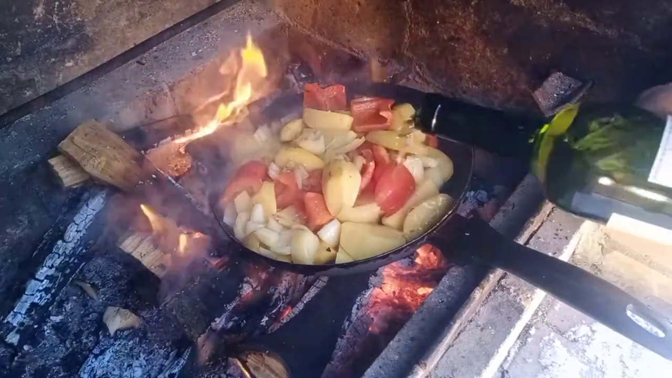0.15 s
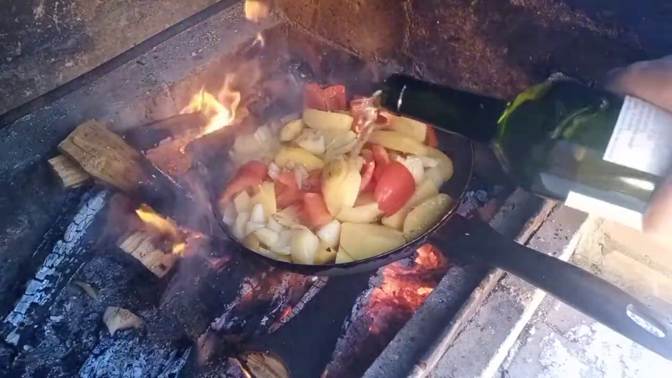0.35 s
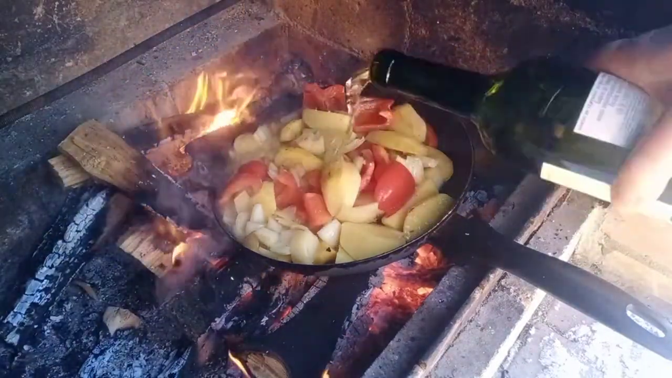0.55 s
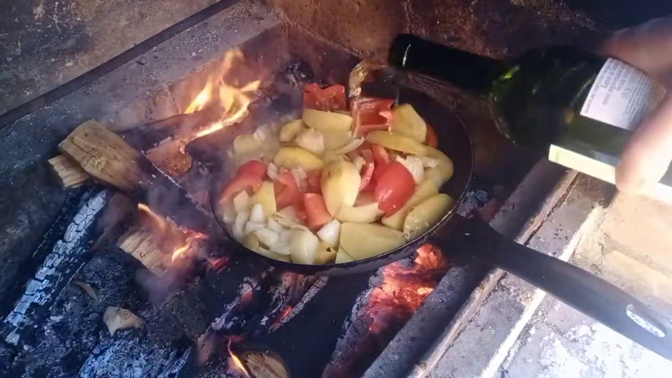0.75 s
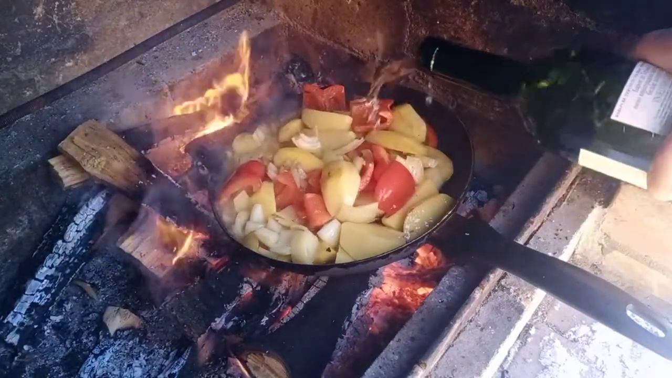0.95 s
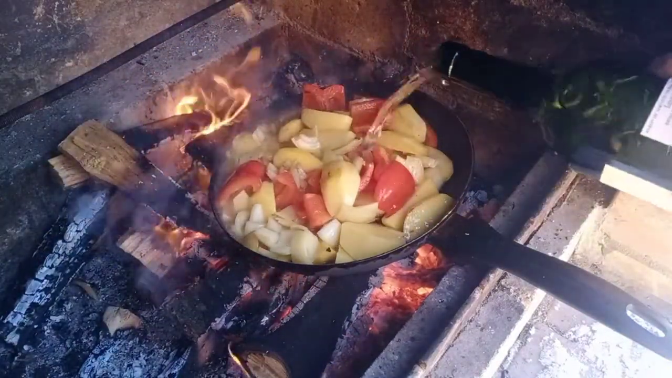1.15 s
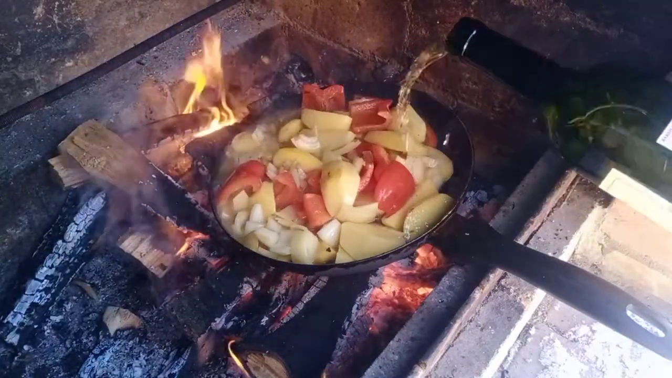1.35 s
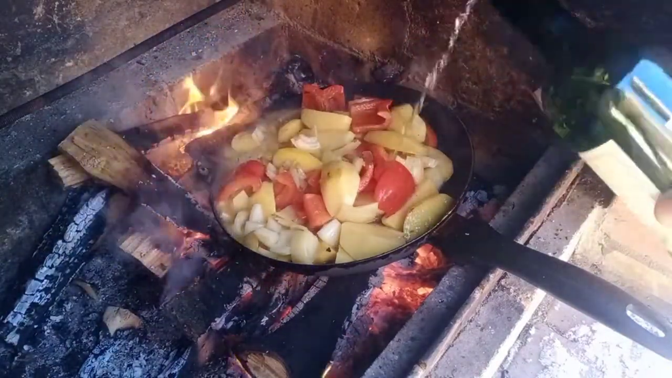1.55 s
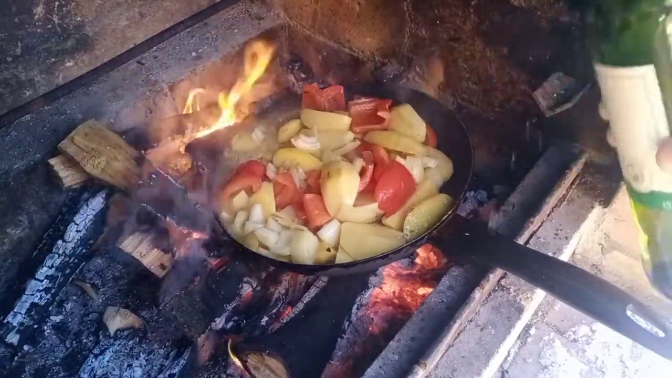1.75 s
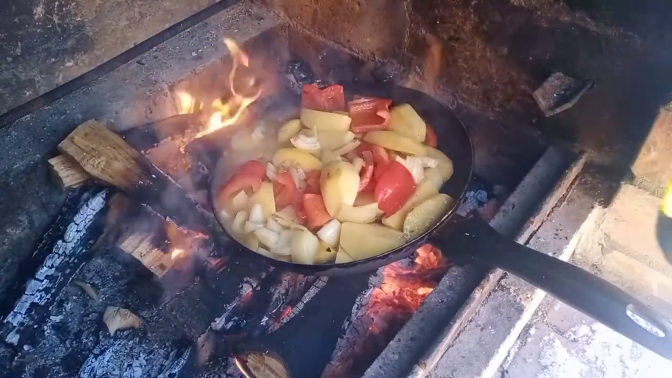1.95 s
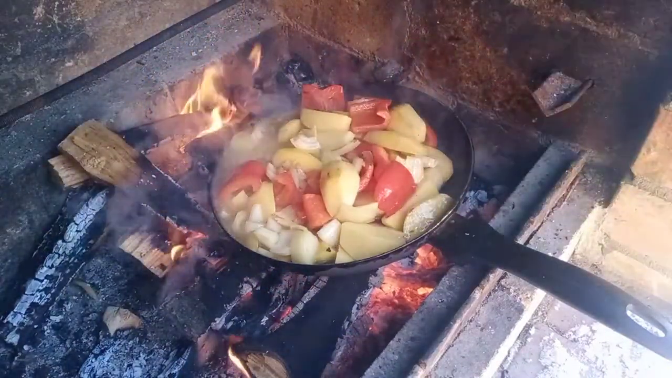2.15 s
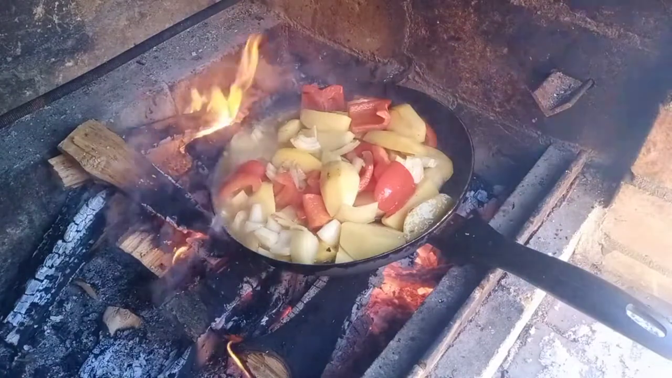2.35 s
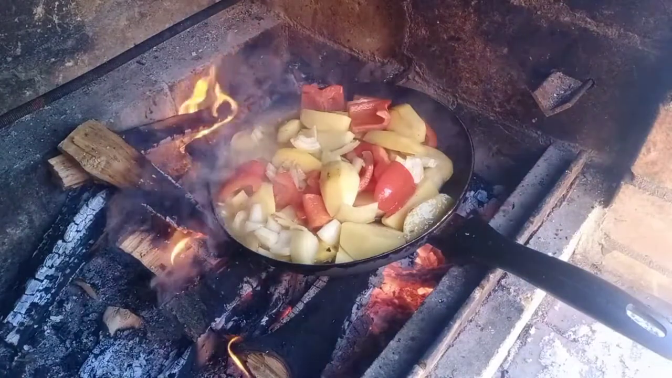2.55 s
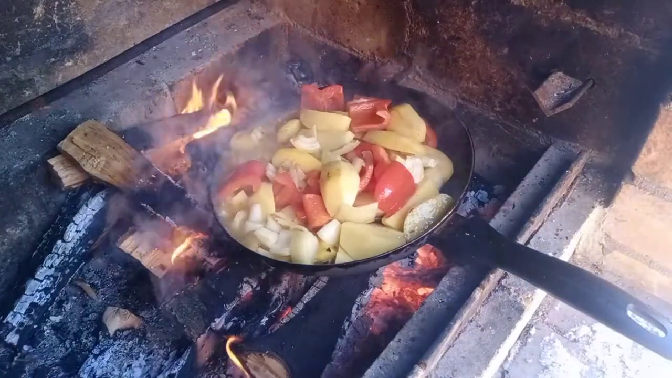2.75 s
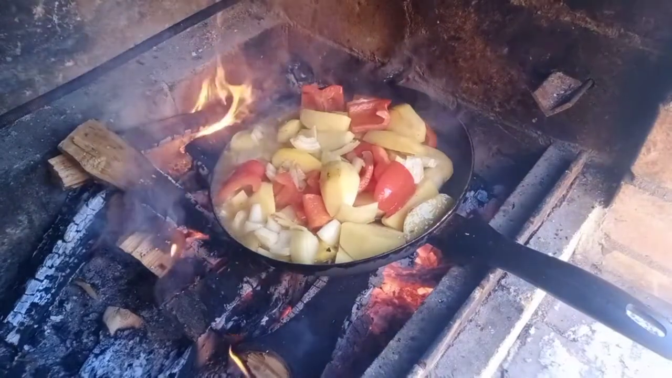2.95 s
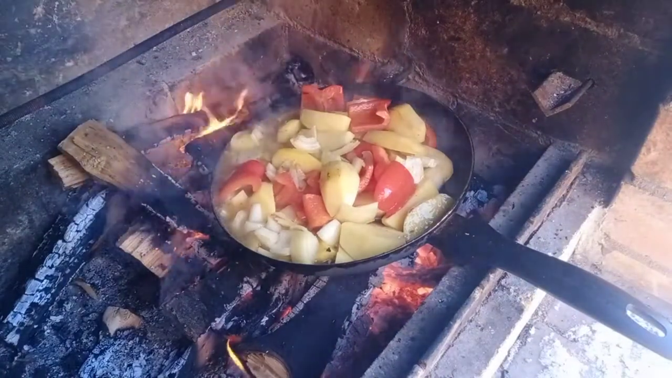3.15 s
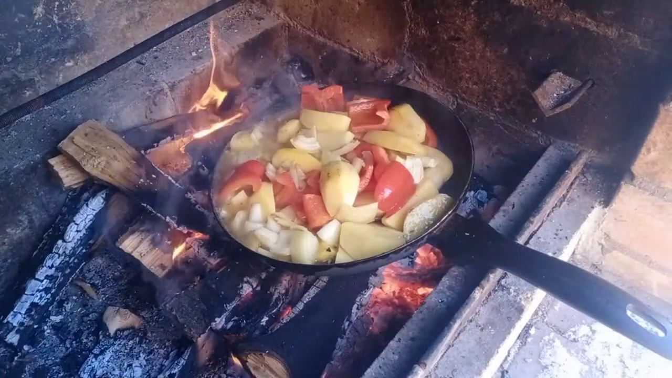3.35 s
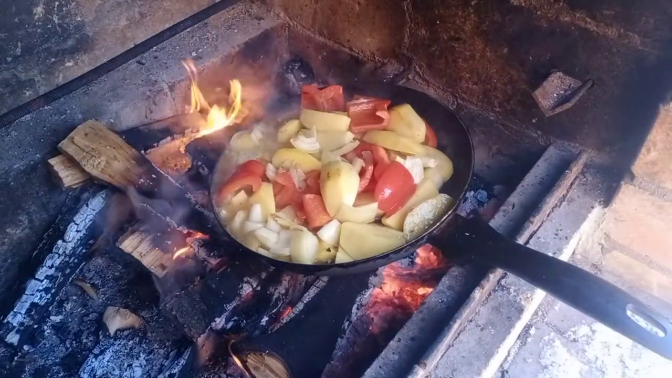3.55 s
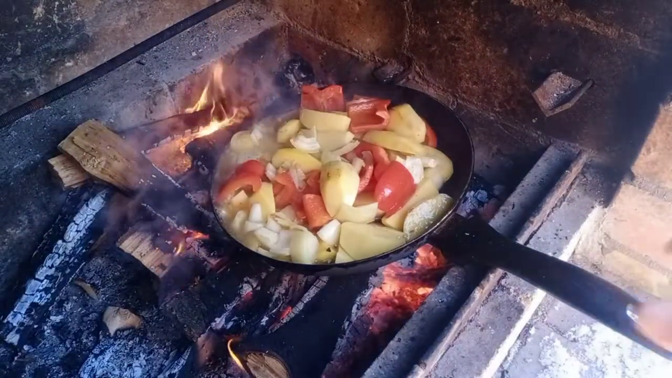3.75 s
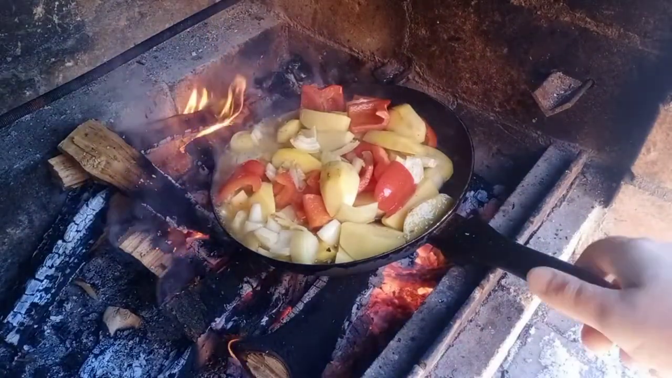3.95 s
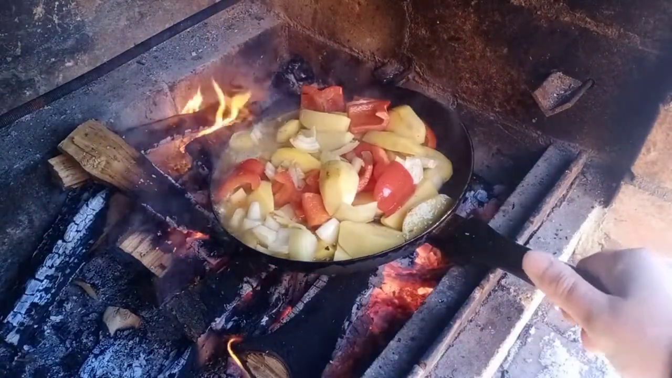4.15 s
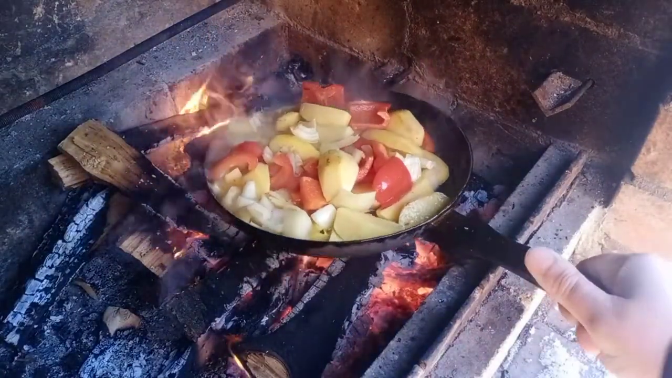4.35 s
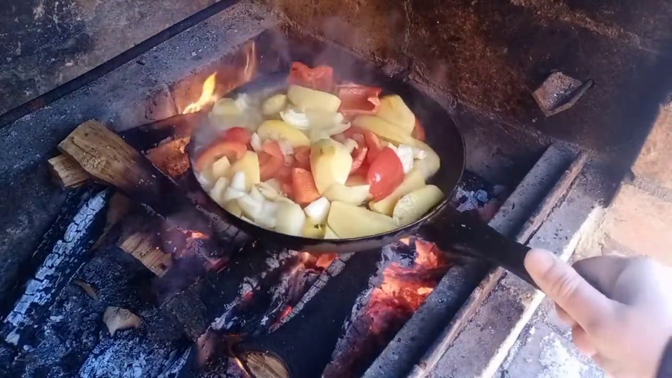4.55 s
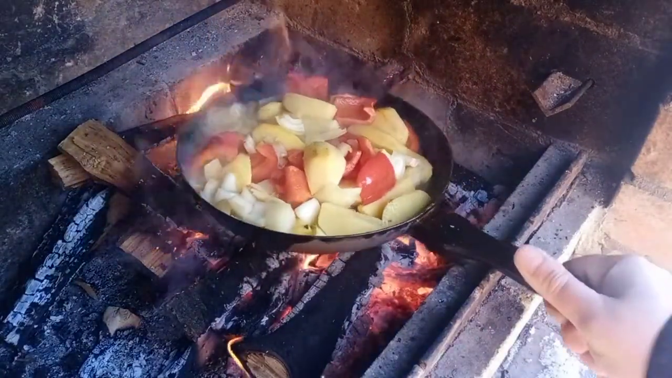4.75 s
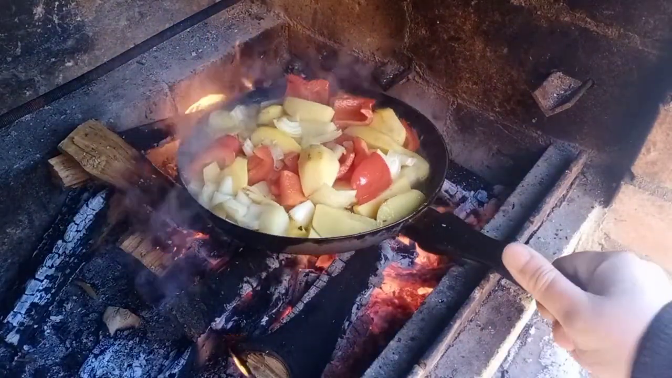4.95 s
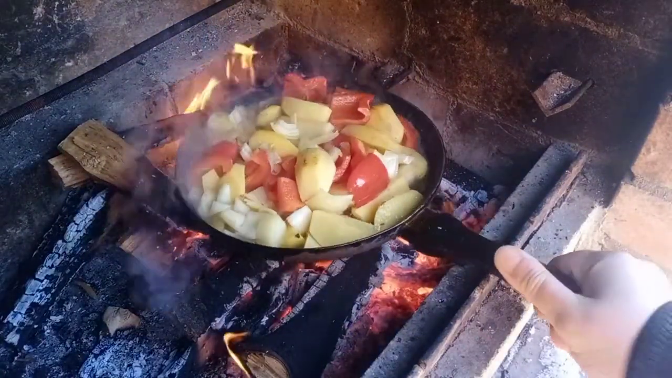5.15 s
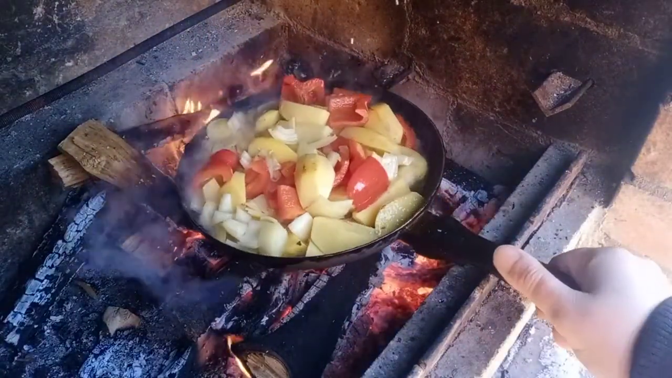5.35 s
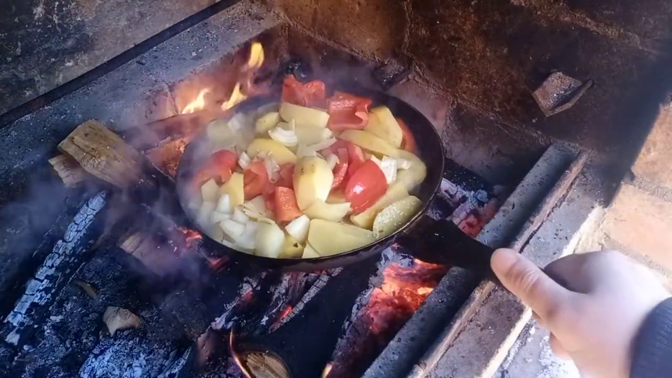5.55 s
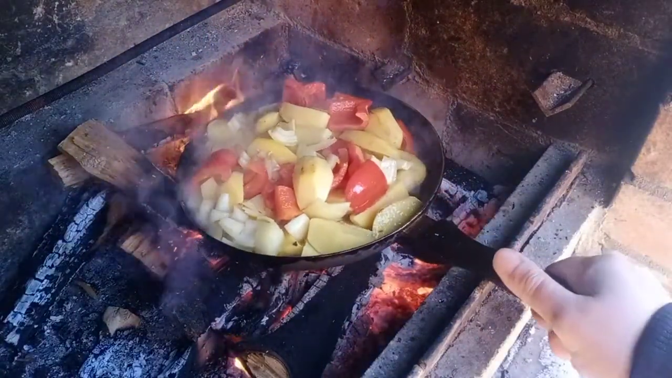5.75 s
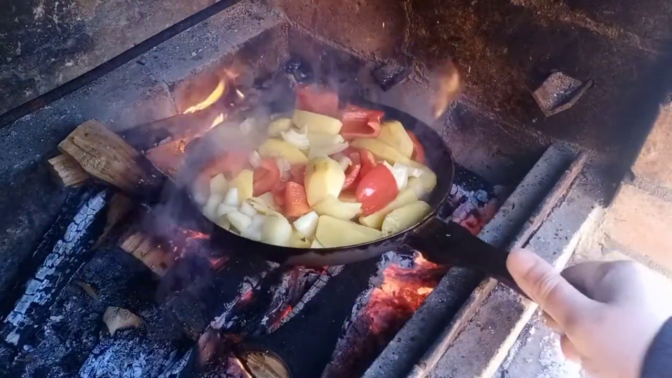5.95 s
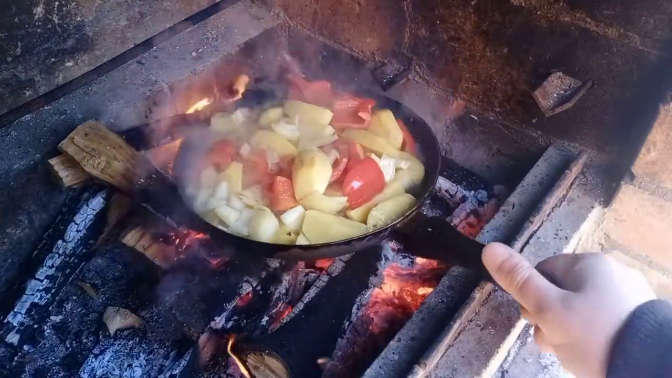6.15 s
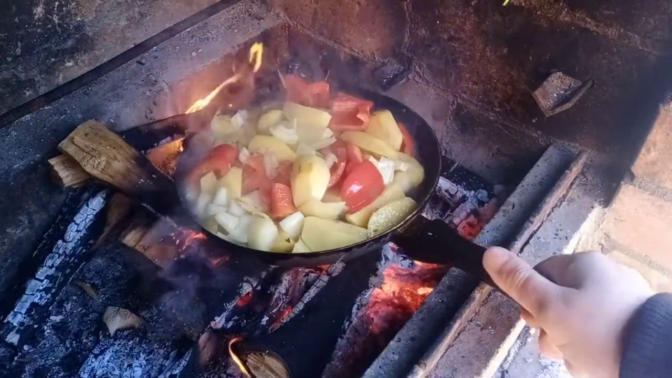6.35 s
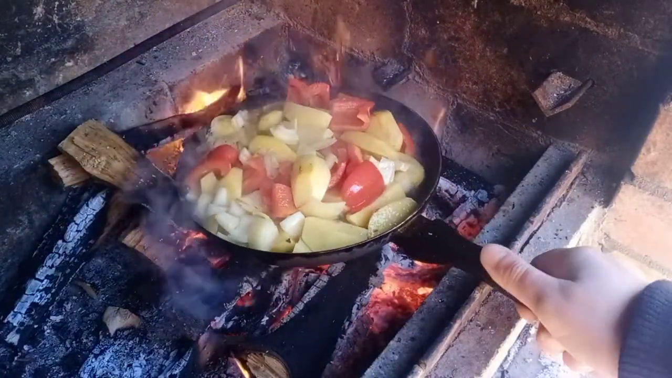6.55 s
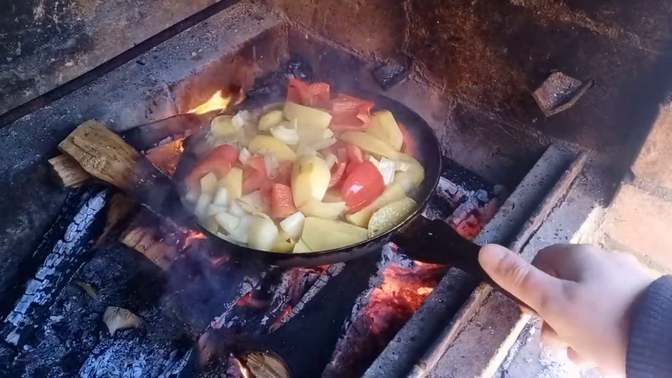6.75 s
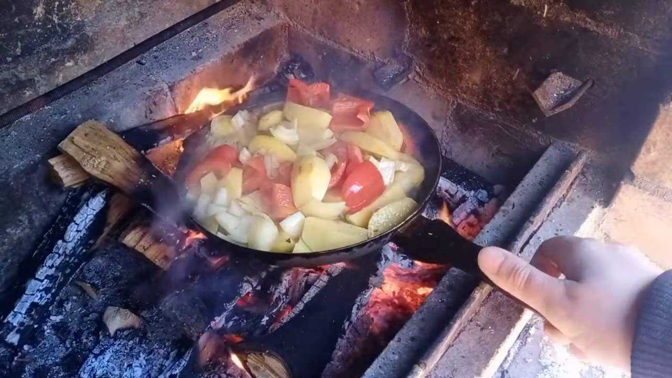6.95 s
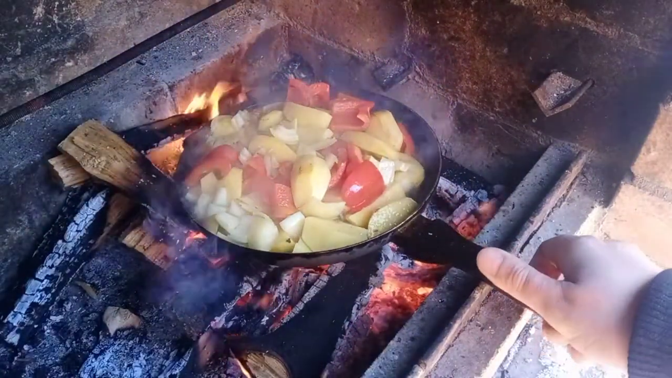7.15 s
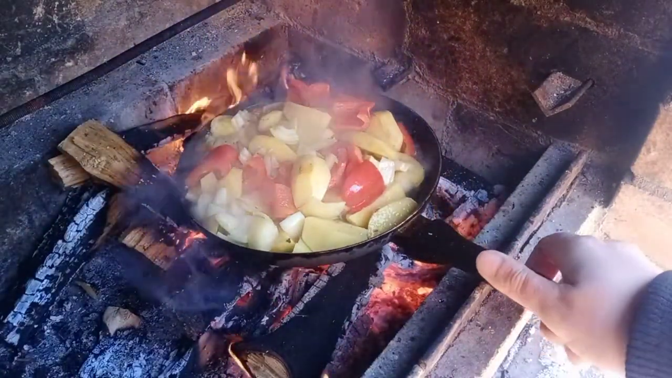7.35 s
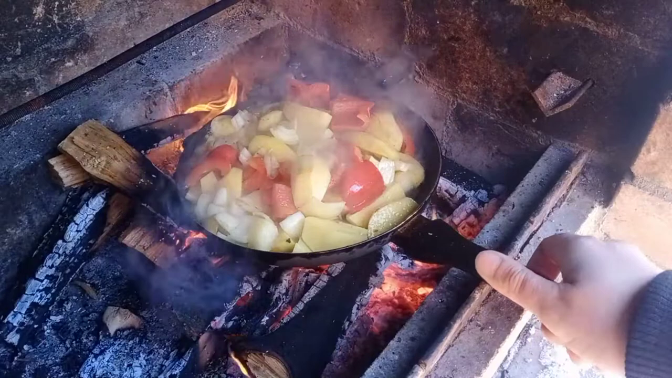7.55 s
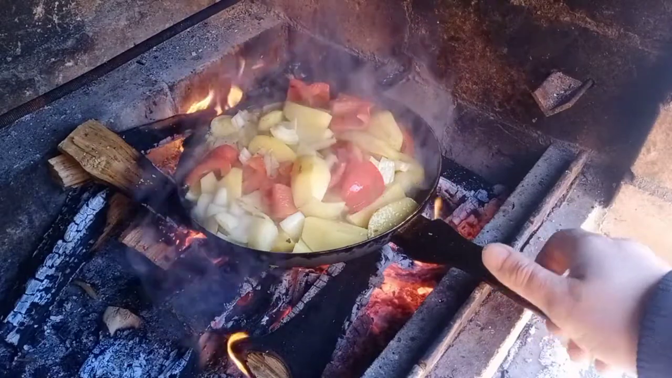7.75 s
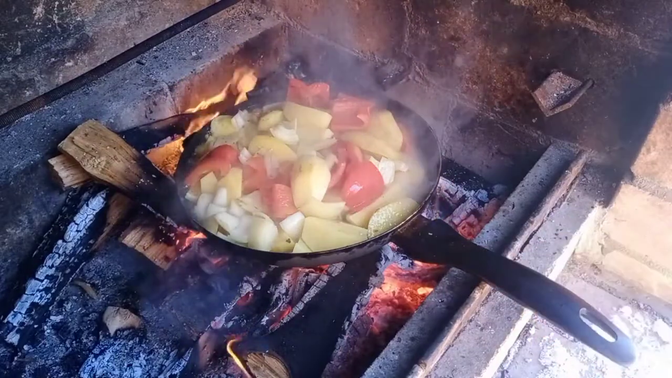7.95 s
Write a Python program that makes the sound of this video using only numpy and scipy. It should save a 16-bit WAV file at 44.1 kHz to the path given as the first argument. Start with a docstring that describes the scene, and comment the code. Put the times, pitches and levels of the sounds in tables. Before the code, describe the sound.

Close-up of a hot iron pan of vegetables on an outdoor wood fire. A strong, bright steam hiss with dense bubbling starts at once, with low gurgles and fluttering flames beneath. It eases after a few seconds, surges briefly around five seconds, then dries into separate sharp spits and snaps, fading quietly. Dry, mono, close microphone.

```python
"""Steam hiss and swarms of bursting bubbles rise from liquid boiling off in a hot iron pan on a wood fire.
Hiss is patchy noise, bubbles are short noise puffs; as the pan dries, single banded spits stand out.
Below, a deeper boil is noise bands and wandering gurgle tones, strongest early and again near 5 s.
Flames flutter and flare in the bass as filtered noise, with a weak roar and a quiet air bed."""
import sys
import numpy as np
from scipy import signal
from scipy.fft import rfft, irfft, next_fast_len
from scipy.io import wavfile
from scipy.ndimage import uniform_filter1d, map_coordinates

SR = 44100
rng = np.random.default_rng(int(sys.argv[2]) if len(sys.argv) > 2 else 0)


def file_out(sig):
    """Save sig as 16-bit WAV at sys.argv[1]."""
    # one column per channel
    cols = np.atleast_2d(sig).T
    # limit, then scale
    lim = np.clip(cols, -1, 1)
    pcm = np.round(lim * 32767).astype(np.int16)
    wavfile.write(sys.argv[1], SR, pcm)


N = 356761

# Pan levels: (time [s], sizzle [dB], fine spray [dB], rim [dB])
PAN_LEVELS = [(0, -23.5, -31.5, -44.5), (1.5, -24.5, -31.5, -42), (2, -26, -31.5, -41.5),
              (2.9, -26.5, -31.5, -44), (3.5, -28.5, -34, -49.5), (4, -29, -33, -42.5),
              (4.4, -30, -35, -58), (4.7, -28.5, -32, -62), (5, -25.5, -33.5, -40.5),
              (5.3, -26.5, -34, -48), (5.6, -29, -37, -52), (5.9, -32, -40, -78), (6.2, -29, -35, -52.5),
              (6.8, -32, -38, -58), (7.1, -34, -40.5, -77), (7.4, -35.5, -42.5, -66),
              (7.7, -35.5, -43.5, -67), (8.09, -36.5, -40, -52.5)]
# Gain of the pan and its load: (frequency [Hz], relative gain [dB])
PAN_COLOUR = [(640, -55.5), (1080, -33), (1220, -24), (1320, -11), (1410, -10.5), (1480, -10.5),
              (1550, -10.5), (1670, -6.5), (1970, -6), (2140, -9), (2240, -9), (2660, -1.5), (2830, -5),
              (3250, -2), (3370, -7), (3560, -3.5), (4190, 0.5), (4550, -4), (4930, -5), (5400, 1),
              (5710, -1), (6140, -5), (6970, -12.5), (7780, -18.5), (9500, -45), (12400, -61),
              (20900, -120)]
# Gain of the fine spray: (frequency [Hz], relative gain [dB])
SPRAY_COLOUR = [(4710, -28.5), (8000, -15), (9220, -20.5), (11300, -17.5), (12700, -9), (14000, -3),
                (15800, -1)]
# Gain of the rim, lowest band of the hiss: (frequency [Hz], relative gain [dB])
RIM_COLOUR = [(1150, -66.5), (1260, -1.5), (1340, -1.5), (1470, 6.5), (1580, -23), (1800, -52.5)]
THIN_HZ, THIN_SHARE = 2280, 0.24  # a fully dry pan loses this share of its sizzle below THIN_HZ

# Base levels of the low sounds: (time [s], upper boil [dB], roar [dB], bubbling [dB])
LOW_LEVELS = [(0, -44.5, -50.5, -47), (.7, -43.5, -53, -48), (.83, -52, -56.5, -57), (.95, -43.5, -58, -50),
              (1.55, -44.5, -62, -49), (2.1, -46.5, -64.5, -50), (2.3, -52.5, -67, -54.5),
              (2.95, -46.5, -64, -53), (3.35, -56, -67, -53), (3.9, -62.5, -69, -61), (4.75, -70, -71, -66),
              (5, -46, -63, -52), (5.3, -44, -55, -55), (5.5, -66, -66, -60.5), (6.3, -72, -69, -65),
              (7.1, -67, -71.5, -72), (8.09, -86, -68.5, -72)]
# Gain of the upper boil: (frequency [Hz], relative gain [dB])
UPPER_BOIL_COLOUR = [(530, -62.5), (900, -4), (934, -2), (970, 8.5), (1300, 13.5), (1690, -14),
                     (2860, -120)]
# Bubble sizes the load favours: (frequency [Hz], relative gain [dB])
LOOSE_COLOUR = [(260, -46.5), (450, -5.5), (470, -16), (510, -4), (595, -4), (621, -3.5), (710, -19),
                (795, 1.5), (891, -15), (968, 1.5), (1070, -8), (1150, 3), (1500, -26), (2530, -120)]
LOOSE_DB = -5.5  # re bubbling level
# Big and small steam pockets: (centre [Hz], width [Hz])
POCKETS = [(565, 139.7), (800, 88)]
# Big and small pockets between gurgles: level re bubbling [dB]
POCKETS_DB = [-14.5, -12]
# Gurgles of both pocket sizes: (start [s], length [s], level [dB], pitch before wander [Hz])
GURGLES = [(0.004, 0.11, -47, 558), (0.126, 0.17, -53, 563), (0.333, 0.11, -51, 542),
           (0.46, 0.176, -50, 558), (0.72, 0.055, -46, 575), (0.948, 0.13, -51.5, 565),
           (1.134, 0.03, -49, 591), (1.189, 0.04, -51.5, 595), (1.267, 0.18, -50.5, 553),
           (1.461, 0.048, -53.5, 552), (1.546, 0.085, -53, 598), (1.681, 0.077, -50, 590),
           (1.912, 0.068, -52.5, 593), (2.017, 0.037, -56, 600), (2.104, 0.054, -48.5, 591),
           (0.009, 0.18, -54, 797), (0.615, 0.054, -54, 795), (0.853, 0.038, -53, 800),
           (1.266, 0.052, -53, 793), (1.422, 0.04, -57, 803), (1.641, 0.075, -55, 802),
           (1.802, 0.14, -58.5, 797), (2.023, 0.059, -51, 802), (2.238, 0.035, -59, 800),
           (2.407, 0.023, -48, 796), (2.8, 0.04, -56.5, 802), (2.913, 0.075, -46, 799),
           (3.21, 0.11, -53, 801), (5.07, 0.03, -52, 796), (5.248, 0.16, -53, 808)]
SOFT_S = 0.01  # half the edge width of gurgles and flares

# Steady flutter, before sway: (time [s], level [dB])
FLAME_LEVELS = [(0.0, -61), (0.4, -65), (1.67, -70), (2.68, -63), (3.87, -70), (4.64, -65), (4.75, -65),
                (5.16, -63.5), (6.76, -71), (6.89, -63.5), (7.73, -72), (8.09, -72)]
# Flares: (start [s], length [s], level [dB])
FLARES = [(0.013, 0.075, -56), (0.098, 0.088, -54), (0.22, 0.12, -55), (0.351, 0.094, -54),
          (0.459, 0.1, -49), (0.666, 0.046, -62), (0.75, 0.15, -57), (1.032, 0.036, -49),
          (1.119, 0.044, -59), (1.173, 0.073, -49.5), (1.289, 0.04, -60), (1.345, 0.036, -57),
          (1.486, 0.052, -53), (1.724, 0.12, -48), (1.87, 0.042, -60), (1.912, 0.057, -54),
          (2.039, 0.032, -56), (2.191, 0.079, -59.5), (2.919, 0.042, -55), (3.104, 0.061, -62),
          (4.194, 0.056, -57.5), (4.637, 0.072, -58), (4.965, 0.08, -52.5), (5.133, 0.059, -55),
          (5.22, 0.1, -56), (5.356, 0.11, -60), (5.653, 0.043, -58), (5.735, 0.092, -58),
          (6.17, 0.095, -55.5), (6.391, 0.057, -57), (6.725, 0.058, -57), (7.016, 0.047, -52),
          (7.21, 0.022, -56), (7.403, 0.036, -62), (7.903, 0.061, -58.5)]
# Gain of the flame flutter: (frequency [Hz], relative gain [dB])
FLUTTER_COLOUR = [(15, -48), (25, -37), (50, -7), (75, 6.5), (92, -0.5), (112, 7.5), (135, 1), (160, -10),
                  (210, -45), (350, -120)]
# Gain of the roar: (frequency [Hz], relative gain [dB])
ROAR_COLOUR = [(94, -23), (160, -0.5), (232, 4), (265, -1), (300, 3), (330, -4.5), (364, 3.5), (420, -9),
               (580, -22), (990, -120)]
FLAME_SWAY_DB, FLARE_ROAR_DB = 2.5, 2.5  # scale of the random sway; most a flare lifts the roar

# Gain of the quiet background: (frequency [Hz], relative gain [dB])
AIR_COLOUR = [(15, -24), (25, 8), (107, 9), (433, -7), (543, 9), (1040, 2), (1200, -38), (1560, -36),
              (2640, -120)]
AIR_DB = -71

# Standout spits, before part offsets and life limits:
# (time [s], reference level [dB], low part [dB], high part [dB], life T60 [s])
SPITS = [(0.2094, -18, -36, -34, 0.018), (0.221, -5, -28, -24, 0.022), (0.638, -6, -26, -22, 0.019),
         (1.067, -13, -32, -33, 0.026), (1.162, -17, -24, -32, 0.02), (1.2077, -16, -21, -28, 0.016),
         (1.4406, -4, -38, -22, 0.027), (1.6097, -15, -23, -33, 0.016), (1.6312, -8, -27, -21, 0.02),
         (1.758, -13, -22, -22, 0.035), (1.8375, -15, -20, -20, 0.022), (2.0634, -7, -23, -20, 0.031),
         (2.2196, -9, -34, -30, 0.016), (2.4094, -7, -38, -32.5, 0.017), (2.5262, -10, -30, -25, 0.022),
         (2.724, -15, -28, -17, 0.014), (2.8855, -21, -36, -19, 0.02), (2.9422, -9, -24, -23, 0.022),
         (2.96, -5, -23, -26, 0.02), (3.0383, -11, -25, -23, 0.02), (3.212, -20, -26, -21, 0.012),
         (3.341, -22, -34, -19, 0.02), (3.3975, -21, -38, -20, 0.022), (3.4361, -19, -33, -24, 0.02),
         (3.4562, -11, -31, -27, 0.016), (3.476, -8.5, -23, -21, 0.02), (3.5079, -22, -29, -33, 0.02),
         (3.5268, -16, -33, -22, 0.02), (3.5433, -14, -35, -25, 0.015), (3.6092, -7.5, -25, -27, 0.016),
         (3.668, -20, -31, -19, 0.017), (3.7269, -26, -23, -27, 0.016), (3.7606, -16, -22, -28, 0.026),
         (3.7922, -16, -22, -17, 0.018), (3.818, -14, -37, -29, 0.018), (3.8541, -11, -29, -22, 0.02),
         (3.8945, -14, -22.5, -25, 0.023), (3.9528, -21, -24.5, -22, 0.027), (3.9754, -12, -22, -22, 0.03),
         (4.0507, -9, -40, -18.5, 0.029), (4.128, -20.5, -21, -27, 0.023), (4.159, -13, -30, -21, 0.014),
         (4.1856, -15, -26, -22, 0.03), (4.2795, -12, -23, -19, 0.031), (4.3033, -9, -20.5, -28, 0.013),
         (4.3434, -19, -36, -21, 0.018), (4.363, -27, -38, -21, 0.016), (4.5076, -15, -26, -21, 0.032),
         (4.56, -15, -26, -24, 0.035), (4.5935, -17, -35, -26, 0.02), (4.803, -23, -30, -20, 0.029),
         (5.0277, -14, -19, -22.5, 0.028), (5.1334, -19, -21, -32, 0.017), (5.1547, -17, -31, -23, 0.02),
         (5.3717, -6, -35, -26, 0.022), (5.452, -5.5, -23, -30, 0.025), (5.4854, -10, -40, -25, 0.015),
         (5.571, -9, -21, -22.5, 0.027), (5.6121, -18, -29, -19, 0.018), (5.6628, -13, -24, -19, 0.029),
         (5.7056, -11, -27, -28, 0.033), (5.734, -8, -31, -19, 0.02), (5.761, -8, -38, -24, 0.022),
         (5.7892, -6, -26.5, -20, 0.017), (5.7983, -10, -18, -32, 0.021), (5.8233, -11, -28, -32, 0.034),
         (5.899, -9, -26, -15, 0.027), (5.9244, -22, -42, -33, 0.014), (5.9465, -5, -22, -25, 0.029),
         (5.9852, -19, -35.5, -27, 0.02), (6.018, -14, -22.5, -21, 0.02), (6.0662, -17, -19.5, -24, 0.022),
         (6.113, -15, -20, -20.5, 0.03), (6.1543, -11, -18, -29, 0.016), (6.203, -19, -29, -20, 0.025),
         (6.2383, -20, -27, -20, 0.022), (6.2721, -9, -25, -34, 0.026), (6.336, -15, -33.5, -28, 0.016),
         (6.3868, -18, -32, -24, 0.02), (6.4073, -9, -27, -28, 0.027), (6.4866, -20, -25, -27, 0.039),
         (6.545, -28, -19, -34, 0.02), (6.6264, -22, -20, -20.5, 0.022), (6.652, -13, -28, -23, 0.02),
         (6.721, -12, -26.5, -18.5, 0.028), (6.8269, -18, -21.5, -32, 0.037),
         (6.8655, -9.5, -26, -29, 0.018), (6.9184, -19, -32, -33, 0.016), (6.934, -12, -24, -28, 0.022),
         (6.9606, -19, -46, -23, 0.027), (6.993, -16.5, -44, -26, 0.023), (7.014, -9, -29, -36, 0.023),
         (7.0506, -8, -22.5, -28, 0.052), (7.0853, -21, -29, -30, 0.027), (7.1112, -13, -30, -23, 0.027),
         (7.1686, -21, -37.5, -31, 0.017), (7.2103, -6.5, -34, -27, 0.044), (7.253, -5, -38.5, -20.5, 0.03),
         (7.2825, -7.5, -45, -31, 0.028), (7.353, -13, -25, -37.5, 0.036), (7.3796, -18, -30, -28.5, 0.023),
         (7.453, -31, -48, -40, 0.01), (7.4762, -14, -21.5, -25.5, 0.039), (7.5406, -20, -26, -24, 0.039),
         (7.5797, -27.5, -26, -31, 0.037), (7.5984, -26, -24, -28, 0.027), (7.624, -17, -30, -33, 0.028),
         (7.6705, -18.5, -33.5, -33, 0.048), (7.6958, -15, -26, -30, 0.043),
         (7.7498, -11, -29.5, -27, 0.022), (7.776, -10, -37.5, -30, 0.02), (7.8054, -17, -27, -29, 0.055),
         (7.8406, -27, -33, -37, 0.025), (7.883, -12, -31, -37, 0.02), (7.9, -14, -18.5, -21.5, 0.03),
         (7.9436, -29, -36, -38, 0.014), (7.976, -17, -46.5, -34, 0.022), (8.026, -16, -31, -31, 0.018),
         (8.0716, -25, -36, -33, 0.018), (8.0721, -10, -25, -35, 0.028)]
# Low, middle and high part of a spit, before scatter: (centre [Hz], bell sigma [octaves])
SPIT_BANDS = [(2600, 0.4), (4050, 0.19), (5500, 0.23)]
# Bright cracks: (time [s], peak [dB])
SNAPS = [(2.7901, -33), (3.024, -35), (3.7244, -33), (4.0482, -31.5), (4.2777, -29), (4.3625, -27),
         (4.803, -28), (5.7887, -28), (5.901, -17), (6.0212, -36), (6.0671, -34), (6.11, -28),
         (6.5859, -31), (6.9152, -33), (6.9601, -30), (6.9925, -28), (7.1701, -27), (7.3517, -31),
         (7.8984, -32), (8.0237, -32)]
MIDDLE_DB, CREST_DB = -10, 4  # middle part peak re reference; low and high part peak re rms
RIM_RING_HZ, RIM_RING_DB = 1408, -16.5  # ring level re low part peak
SNAP_HZ, SNAP_T60_S = 7100, 0.0025
SPIT_SNAP_DB = -33  # snap re spit reference, before scatter
SMALL_T60_S, SMALL_LEAN_DB = 0.019, 5  # lesser spits: life; most they lean low or high
SMALL_OVER_DB, SMALL_SPREAD_DB = 5, 7.5  # lesser spits: mean over sizzle level; scatter either way

TOP_HZ = 15830


def amp(db):
    """dB to gain."""
    return 10 ** (np.asarray(db) / 20)


def unit(x):
    """Scaled to rms 1."""
    return x / np.sqrt(np.mean(x ** 2) + 1e-20)


def curves(rows):
    """One value per sample for each column after the time."""
    s, *cols = np.transpose(rows)
    return [np.interp(np.arange(N) / SR, s, c) for c in cols]


def wobble(rate_hz):
    """Smooth random curve with rate_hz knots a second."""
    knots = rng.standard_normal(int(N * rate_hz / SR) + 4)
    return map_coordinates(knots, [np.arange(N) * rate_hz / SR])


def coloured(x, points):
    """Causal minimum-phase filter through (Hz, dB) points on a log-frequency axis."""
    m = 2 * next_fast_len(N // 2 + 4096)
    f, db = np.transpose(points)
    hz = np.fft.rfftfreq(m, 1 / SR)
    gain = amp(np.interp(np.log(hz + 1), np.log(f + 1), db))
    # folding the cepstrum gives minimum phase
    cep = irfft(np.log(gain + 1e-6), m)
    cep[1:m // 2] *= 2
    cep[m // 2 + 1:] = 0
    return irfft(rfft(x, m) * np.exp(rfft(cep)), m)[:N]


def rush(patchy_db):
    """White noise with patches of random gain in time and frequency."""
    z = signal.stft(rng.standard_normal(N), nperseg=256)[2]
    field = uniform_filter1d(rng.standard_normal(z.shape), size=5, axis=0)
    field = uniform_filter1d(field, size=6, axis=1)
    return signal.istft(z * amp(patchy_db * unit(field)), nperseg=256)[1][:N]


def bursts(s, peak_db, centre_hz, t60_s, octaves, rise_s):
    """Noise puffs with a bell spectrum, quick rise and exponential decay, cut at 1024 samples."""
    t = np.arange(1024) / SR
    hz = np.fft.rfftfreq(len(t), 1 / SR) + 1
    bell = np.exp(-.5 * (np.log2(hz / centre_hz[:, None]) / octaves) ** 2)
    puff = irfft(rfft(rng.standard_normal((len(s), len(t)))) * bell, len(t))
    puff *= amp(-60 * t / t60_s[:, None]) * (1 - np.exp(-t / rise_s))
    puff *= (amp(peak_db) / np.abs(puff).max(axis=1))[:, None]
    at = np.round(s * SR).astype(int)[:, None] + np.arange(len(t))
    return np.bincount(at.ravel(), puff.ravel(), N + SR)[:N]


def swarm(count, spread_db, centre_hz, octaves, t60_s):
    """Bubbles burst at random moments; few are large, and each has its own pitch and life."""
    when, size = rng.random(size=(2, count))
    pitch, life = rng.standard_normal(size=(2, count))
    db = -spread_db * np.log(size + .02)
    lives_s = t60_s * 2 ** (.4 * life)
    return bursts(when * N / SR, db, centre_hz * 2 ** (.6 * pitch), lives_s, octaves, rise_s=0.00072)


def swells(rows):
    """Summed power of soft-edged swells (start s, length s, level dB)."""
    power = np.zeros(N)
    for s, length, db in rows:
        power[round(s * SR):round((s + length) * SR)] += amp(db) ** 2
    edge = np.hanning(round(2 * SOFT_S * SR))
    return np.abs(signal.fftconvolve(power, edge / edge.sum(), "same"))


def sizzle():
    """Steam hiss and bubbles share the pan's colour; spray and rim swell with pan loudness."""
    body_db, spray_db, rim_db = curves(PAN_LEVELS)
    # a quieter pan is drier: less sheet of steam, more sputter
    dryness = np.clip((-25 - body_db) / 12, 0, 1)
    surge_db = (0.48 + 1.3 * dryness) * (0.53 * wobble(24) + 0.49 * wobble(50))

    hiss = unit(coloured(rush(patchy_db=1.5), PAN_COLOUR))
    wide = swarm(count=1800, spread_db=0.5, centre_hz=3580, octaves=0.46, t60_s=0.024)
    narrow = swarm(count=1500, spread_db=0.5, centre_hz=4150, octaves=0.095, t60_s=0.29)
    splashes = unit(coloured(wide, PAN_COLOUR))
    pings = unit(coloured(narrow, PAN_COLOUR))
    mix = (1 - 0.23 * dryness) * hiss + (0.72 + 0.13 * dryness) * splashes + .65 * pings
    body = amp(surge_db) * mix / 1.34

    below = 1 / (1 + (np.fft.rfftfreq(N, 1 / SR) / THIN_HZ) ** 6)
    body = body - THIN_SHARE * dryness * irfft(rfft(body) * below, N)

    pan = amp(body_db) * body + spits(body_db, dryness)
    swell = np.sqrt(np.abs(uniform_filter1d(pan ** 2, size=130))) / amp(body_db)
    ticks = swarm(count=700, spread_db=4.5, centre_hz=12000, octaves=1.0, t60_s=0.011)
    mist = unit(swell ** 0.7 * rush(patchy_db=2.0))
    spray = unit(coloured(mist + 0.36 * unit(ticks), SPRAY_COLOUR))
    rim = unit(coloured(swell ** 1.1 * rush(patchy_db=2.5), RIM_COLOUR))
    return pan + amp(spray_db) * spray + amp(rim_db) * rim


def deep_boil(low_sway_db):
    """Steam pockets gurgle in two wandering bands, among upper boil noise and loose bubbles."""
    sway_db = 0.75 * low_sway_db + 2.4 * wobble(10)
    upper_db, _, bubbling_db = np.array(curves(LOW_LEVELS)) + sway_db
    lumps = amp(2.5 * wobble(25))
    upper = unit(coloured(lumps * rush(patchy_db=3.5), UPPER_BOIL_COLOUR))
    boil = amp(upper_db + 0.8 * wobble(20)) * upper
    bubbles = swarm(count=900, spread_db=4.5, centre_hz=696, octaves=0.16, t60_s=0.056)
    boil += amp(bubbling_db + LOOSE_DB) * unit(coloured(bubbles, LOOSE_COLOUR))
    for under_db, (hz, width_hz) in zip(POCKETS_DB, POCKETS):
        boil += pockets(hz, width_hz, bubbling_db + under_db, lumps)
    return boil


def pockets(hz, width_hz, level_db, lumps):
    """One pocket size: a lumpy noise band, plus gurgles whose pitch shifts as pockets swell and empty."""
    rows = np.array([row for row in GURGLES if abs(row[3] - hz) < 110])
    band = signal.butter(3, [hz - width_hz / 2, hz + width_hz / 2], "band", fs=SR, output="sos")
    blur = unit(signal.sosfilt(band, rng.standard_normal(N)))
    middle_s = rows[:, 0] + rows[:, 1] / 2
    pitch_hz = np.interp(np.arange(N) / SR, middle_s, rows[:, 3]) + .3 * width_hz * wobble(13)
    tone = unit((1.05 + wobble(35)) * np.sin(2 * np.pi * np.cumsum(pitch_hz) / SR))
    between = amp(level_db + 2.2 * wobble(10)) * unit(lumps ** 1.8 * blur)
    return between + np.sqrt(swells(rows[:, :3])) * unit(0.96 * blur + tone)


def fire(low_sway_db):
    """Flames flutter as bass noise and flare now and then, with a weaker roar above."""
    roar_db = curves(LOW_LEVELS)[1]
    steady = amp(curves(FLAME_LEVELS)[0] + FLAME_SWAY_DB * wobble(14)) ** 2
    flares = swells(FLARES)
    flutter = unit(coloured(rng.standard_normal(N), FLUTTER_COLOUR))
    # the beating of the noise is partly evened out
    even = unit(flutter / (uniform_filter1d(flutter ** 2, size=1500) + .1) ** 0.44)
    roar = unit(coloured(amp(low_sway_db) * rush(patchy_db=5.0), ROAR_COLOUR))
    lift_db = FLARE_ROAR_DB * flares / (flares + steady)
    return np.sqrt(steady + flares) * even + amp(roar_db + lift_db) * roar


def background_air(low_sway_db):
    """Quiet low noise swaying with the shared low gain."""
    noise = unit(coloured(rng.standard_normal(N), AIR_COLOUR))
    return amp(AIR_DB + 1.9 * low_sway_db) * noise


def lesser_spits(body_db, dryness):
    """Random small spits in the columns of SPITS, more of them as the pan dries."""
    when, keep, size, tilt = rng.random(size=(110, 4)).T
    at = (when * N).astype(int)
    db = body_db[at] + SMALL_OVER_DB + SMALL_SPREAD_DB * (2 * size - 1)
    lean_db = SMALL_LEAN_DB * (2 * tilt - 1)
    low_db, high_db = db - CREST_DB - lean_db, db - CREST_DB + lean_db
    rows = np.array([at / SR, db, low_db, high_db, 0 * at + SMALL_T60_S])
    return rows[:, keep < 1.3 * dryness[at]]


def spits(body_db, dryness):
    """Single bubbles burst as puffs in three bands with a rim ring and a bright snap."""
    rows = np.hstack([np.transpose(SPITS), lesser_spits(body_db, dryness)])
    s, db, low_db, high_db, t60_s = rows
    t60_s, alike = np.clip(t60_s, .005, .06), np.ones(len(s))
    stray = rng.standard_normal(size=(len(s), 4)).T
    parts_db = low_db + CREST_DB, db + MIDDLE_DB, high_db + CREST_DB
    puffs = np.zeros(N)
    for part_db, off, (hz, octaves) in zip(parts_db, stray, SPIT_BANDS):
        puffs += bursts(s, part_db, hz * 2 ** (0.041 * off), t60_s, octaves, rise_s=0.00024)
    # the rim answers the low part
    ring_db = parts_db[0] + RIM_RING_DB
    puffs += bursts(s, ring_db, RIM_RING_HZ * alike, 1.7 * t60_s, octaves=0.075, rise_s=0.0013)

    own_snaps = [s + 0.00063, db + SPIT_SNAP_DB + 4 * stray[3]]
    snap_s, snap_db = np.hstack([np.transpose(SNAPS), own_snaps])
    alike = np.ones(len(snap_s))
    snaps = bursts(snap_s, snap_db, SNAP_HZ * alike, SNAP_T60_S * alike, octaves=0.32, rise_s=.0001)
    band = signal.butter(3, [1250, 7200], "band", fs=SR, output="sos")
    return signal.sosfilt(band, puffs) + snaps


def scene():
    """One microphone feeds both channels; one shared slow gain sways deep boil, roar and air together."""
    low_sway_db = 2.7 * wobble(7.4) + 1.6 * wobble(22)
    mono = sizzle() + deep_boil(low_sway_db) + fire(low_sway_db) + background_air(low_sway_db)
    return np.tile(mono, (2, 1))


def record(dry):
    """The recorder keeps nothing above its band limit."""
    m = next_fast_len(N + 4096)
    keep = np.fft.rfftfreq(m, 1 / SR) < TOP_HZ
    return irfft(rfft(dry, m) * keep, m)[:, :N]


dry = scene()
out = record(dry)
file_out(out)
```